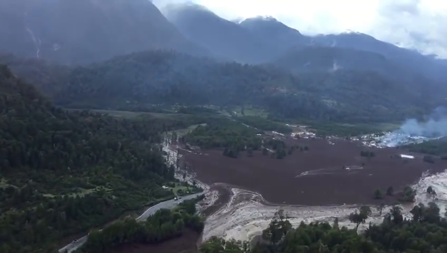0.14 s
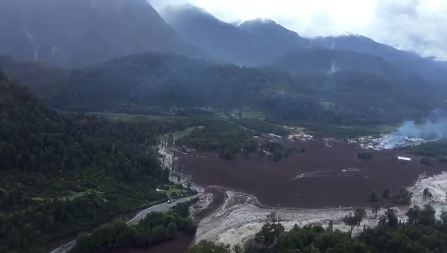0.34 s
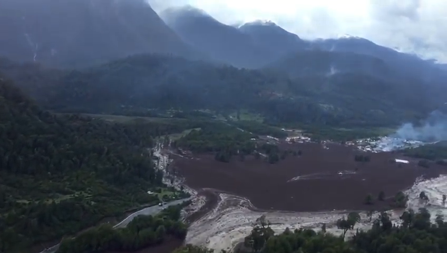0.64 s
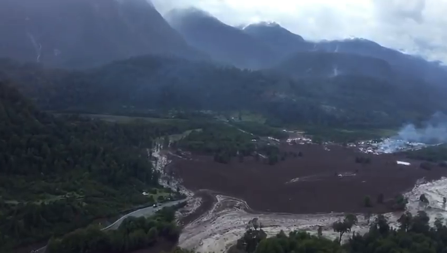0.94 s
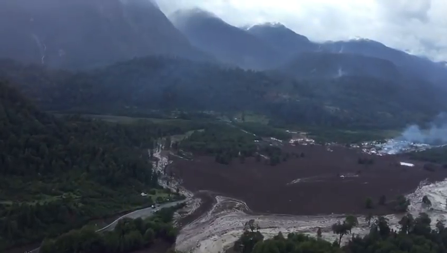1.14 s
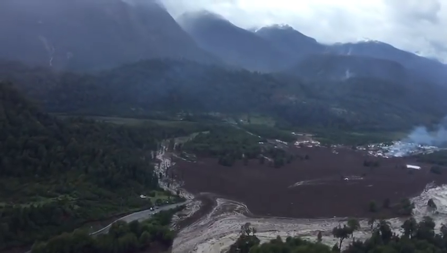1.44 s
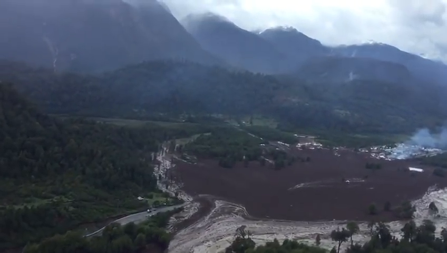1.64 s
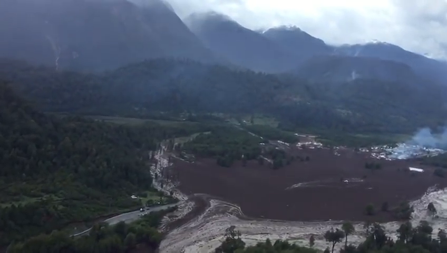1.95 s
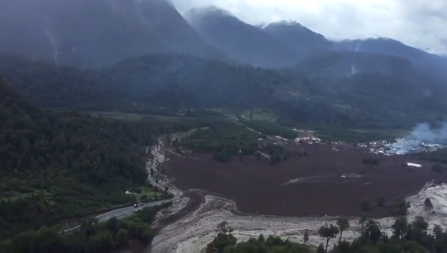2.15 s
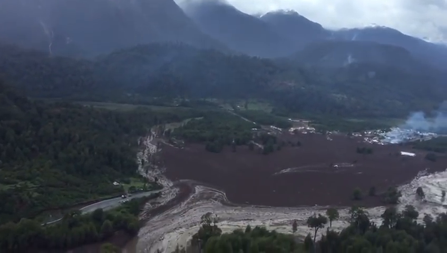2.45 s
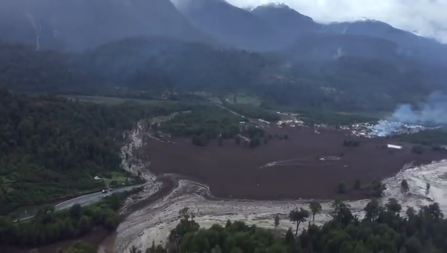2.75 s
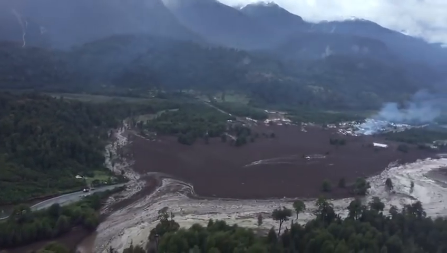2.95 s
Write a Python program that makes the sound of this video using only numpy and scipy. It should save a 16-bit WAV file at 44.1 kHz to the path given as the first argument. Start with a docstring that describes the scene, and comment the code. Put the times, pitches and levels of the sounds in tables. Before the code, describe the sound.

Helicopter in steady flight heard from inside, with a deep rotor drone and high whine.

```python
"""A helicopter's rotors and drive, heard from the cabin in steady cruise.
Main rotor, tail rotor and drive shaft force the cabin periodically, giving three harmonic series
whose neighbouring low tones beat. Gears and turbine whine above them, swelling and fading,
over the broadband rumble, roar, hiss and faint whistle of the air along the hull."""
import sys
import numpy as np
from scipy import signal
from scipy.fft import rfft, irfft, next_fast_len
from scipy.io import wavfile

SR = 44100
rng = np.random.default_rng(int(sys.argv[2]) if len(sys.argv) > 2 else 0)


def master_out(mix):
    """Clip the mix to full scale and print it as 16-bit PCM to the path in sys.argv[1]."""
    frames = np.transpose(np.atleast_2d(mix))
    ceiling = np.clip(frames, -1, 1)
    pcm = np.round(ceiling * 32767).astype(np.int16)
    wavfile.write(sys.argv[1], SR, pcm)


N = 136269
TIME = np.arange(N) / SR
ROTOR_HZ, BLADES = 6.405, 4

# Whine frequencies in Hz: low gear mesh, high gear mesh, thin whine, turbine, turbine octave.
WHINE_HZ = [1821.8, 2432.2, 3425, 4299.8, 8599.6]


def from_db(db):
    """Amplitude grows tenfold with every 20 dB."""
    return 10 ** (np.asarray(db) / 20)


def in_time(rows):
    """Linear interpolation gives a value at every sample. Each row: time in seconds, value."""
    return np.interp(TIME, *np.transpose(rows))


def drift(rate_hz):
    """Low-pass filtering turns white noise into a slow wander of unit standard deviation."""
    hop, settling = 100, 1000
    pole = np.exp(-2 * np.pi * rate_hz * hop / SR)
    white = rng.standard_normal(N // hop + settling + 2)
    slow = signal.lfilter([1], [1, -2 * pole, pole * pole], white)[settling:]
    return np.interp(np.arange(N) / hop, np.arange(len(slow)), slow / slow.std())


def noise(spectrum, repeat=0):
    """Spectral shaping colours white noise; a comb filter feeds back `repeat` of it each rotor turn."""
    hz, db = np.transpose(spectrum)
    size = next_fast_len(N)
    bin_hz = np.maximum(np.arange(size // 2 + 1) * SR / size, 1)
    comb = np.sqrt(1 - repeat ** 2) / (1 - repeat * np.exp(-2j * np.pi * bin_hz / ROTOR_HZ))
    gain = from_db(np.interp(np.log(bin_hz), np.log(hz), db)) * comb
    return irfft(rfft(rng.standard_normal(size)) * gain, size)[:N] * np.sqrt(SR / 2)


def tone(clock, hz, db, jitter_rad=0):
    """A sinusoid of level `db` (rms) follows the drive's clock, so its pitch is proportional to speed."""
    return np.sqrt(2) * from_db(db) * np.sin(2 * np.pi * (hz * clock + rng.random()) + jitter_rad)


def harmonics(clock, hz, orders):
    """A periodic force sounds at whole multiples of its rate; each level wavers a little."""
    return sum(tone(clock, hz * order, db + 0.7 * drift(3)) for order, db in orders.items())


def whine(clock, hz, db):
    """Airframe shaking modulates a tone slightly in amplitude and phase."""
    return tone(clock, hz, db + 0.4 * drift(7), jitter_rad=0.14 * drift(20))


def cabin_rumble():
    """Random air pressure on the hull fills the cabin with low-frequency noise."""
    # Each row: frequency in Hz, density in dB per Hz before the swell.
    spectrum = [(12, -72), (22, -56), (33, -65), (44, -43), (70, -40.5), (105, -48.5), (122, -44),
                (200, -45), (280, -49), (400, -63.5), (900, -105)]
    # Each row: time in seconds, gain in dB.
    swell = [(0, -1), (.9, 0.5), (1.4, 0), (1.6, 3), (1.8, 0.5), (2, -2), (2.15, -1.5), (2.5, -1.5),
             (3.09, .5)]
    return noise(spectrum) * from_db(in_time(swell))


def churning(remainder, depth_db=1.6, rate_hz=11):
    """Turbulence modulates the amplitude of four frequency bands independently."""
    churned = 0
    for edge_hz in (480, 720, 900):
        band = signal.sosfiltfilt(signal.butter(4, edge_hz, fs=SR, output="sos"), remainder)
        churned = churned + band * from_db(depth_db * drift(rate_hz))
        remainder = remainder - band
    return churned + remainder * from_db(depth_db * drift(rate_hz))


def downwash_roar(blade_pulse, chop_db=1.5):
    """Turbulent downwash partly repeats with each rotor turn and rises with each passing blade."""
    # Each row: frequency in Hz, density in dB per Hz before comb filtering and modulation.
    spectrum = [(150, -55.5), (310, -51.5), (415, -50), (455, -54.5), (560, -49), (650, -51), (730, -52),
                (787, -59.5), (830, -50), (870, -60), (1010, -59.5), (1100, -64), (1220, -59), (1350, -71),
                (3000, -105)]
    # Each row: time in seconds, gain in dB.
    swell = [(0, 1.8), (.18, -0.61), (.3, 1.8), (.48, 0), (.8, 0.12), (.95, 2.2), (1.12, 1), (1.4, -0.89),
             (1.7, 0.11), (2.05, -.5), (2.65, -0.48), (3.09, -2.16)]
    roar = churning(noise(spectrum, repeat=0.39))
    return roar * from_db(in_time(swell) + chop_db * blade_pulse)


def slipstream_hiss(blade_pulse, chop_db=1):
    """Blade passage and buffeting modulate the amplitude of high-frequency flow noise."""
    # Each row: frequency in Hz, density in dB per Hz before modulation.
    spectrum = [(700, -83), (1400, -67), (1750, -65.5), (1920, -64.5), (2180, -66), (2360, -62.5),
                (2550, -65.5), (3100, -64), (3750, -66.5), (4300, -63.5), (4850, -72.5), (5350, -70),
                (5800, -71.5), (6500, -73.5), (7500, -80.5), (9000, -80), (10000, -88)]
    # Each row: time in seconds, gain in dB.
    swell = [(0, -0.46), (.7, -1), (1.4, -0.42), (2.3, 0.18), (3.09, 0.19)]
    return noise(spectrum) * from_db(in_time(swell) + chop_db * blade_pulse + 0.5 * drift(13))


def slipstream_whistle():
    """Flow noise confined to a narrow band is heard as a faint, breezy pitch."""
    # Each row: frequency in Hz, density in dB per Hz before the swell.
    spectrum = [(4700, -100), (5150, -76), (5380, -66.5), (5600, -84), (6200, -100)]
    # Each row: time in seconds, gain in dB.
    swell = [(0, -2), (.8, -4), (1.5, -3), (1.75, 3), (2.1, -5), (2.45, 1), (2.75, -7), (3.09, -5)]
    return noise(spectrum) * from_db(in_time(swell))


def rotors(clock, tail_blade_hz=69.32, rise_db_per_s=0.7):
    """Periodic blade forces of the main and tail rotors give two harmonic series, slowly growing."""
    # Each entry: multiple of the main rotor's turning rate, rms level in dB at mid-time.
    main_orders = {8: -29, 10: -37, 12: -29, 14: -40, 16: -31, 20: -33, 21: -33, 22: -32, 23: -33, 24: -30,
                   25: -36.5, 27: -38, 28: -41, 33: -41, 44: -37.5, 48: -38, 59: -43, 63: -39, 64: -39, 67:
                   -42, 83: -39, 87: -43, 90: -42, 91: -42}
    # Each entry: multiple of the tail rotor's blade rate, rms level in dB at mid-time.
    tail_orders = {1: -19.2, 2: -34, 3: -30}
    drone = harmonics(clock, ROTOR_HZ, main_orders) + harmonics(clock, tail_blade_hz, tail_orders)
    return drone * from_db(rise_db_per_s * (TIME - TIME.mean()))


def drive_shaft(clock, shaft_hz=99.98):
    """The turning shaft drives the cabin into forced vibration at harmonics of its rate."""
    # Each entry: multiple of the turning rate, rms level in dB.
    orders = {1: -29.5, 2: -21.7, 4: -41, 6: -38, 8: -43, 12: -51, 16: -55, 24: -45}
    return harmonics(clock, shaft_hz, orders)


def gearbox(clock):
    """Periodic tooth contact gives steady tones and whines that swell and fade."""
    # Gear and accessory tones. Each row: frequency in Hz, rms level in dB.
    steady_tones = [(95, -30), (97.9, -28.5), (754.2, -40), (813, -49.5), (832.5, -48), (1261, -39.5),
                    (1631.3, -44.5), (1846.5, -44.5), (1892, -50), (2477, -52.5), (2792, -49.5),
                    (4100, -56), (4249, -58), (4751, -50), (6850, -58), (9050, -60.5)]
    # Envelopes of three whines. Each row: time in seconds, rms level in dB.
    low_mesh = [(0, -30), (.5, -31.5), (1.1, -32.5), (1.65, -32), (2.1, -36), (2.35, -34), (2.5, -39),
                (2.8, -37), (3.09, -33)]
    high_mesh = [(0, -37), (.35, -38), (.55, -34.5), (1.3, -34.5), (2.1, -33.5), (2.7, -35), (2.9, -39.5),
                 (3.09, -45)]
    thin_whine = [(0, -42), (.3, -50), (.55, -60), (.9, -46), (1.2, -55), (1.6, -47), (2.05, -42),
                  (2.3, -40), (3.09, -36)]
    steady = sum(whine(clock, hz, db) for hz, db in steady_tones)
    swelling = zip(WHINE_HZ[:3], (low_mesh, high_mesh, thin_whine))
    return steady + sum(whine(clock, hz, in_time(levels)) for hz, levels in swelling)


def turbine(clock):
    """Fast rotation gives a high fundamental and its octave, each swelling and fading separately."""
    # Envelopes of the two partials. Each row: time in seconds, rms level in dB.
    fundamental = [(0, -33.5), (.2, -32.5), (.36, -44), (.62, -47), (.88, -36), (1.1, -36), (1.22, -31.5),
                   (1.38, -30.5), (1.6, -33.5), (1.92, -43), (2.4, -43), (2.6, -36.5), (2.72, -38.5),
                   (2.9, -26.2), (3.01, -30.5), (3.09, -27.5)]
    octave = [(0, -64), (.5, -60), (.85, -51), (1.25, -55), (1.6, -62), (2, -58), (2.7, -62), (2.9, -49.5),
              (3.09, -52)]
    partials = zip(WHINE_HZ[3:], (fundamental, octave))
    return sum(whine(clock, hz, in_time(levels)) for hz, levels in partials)


def scene():
    """Air noise and machine tones superpose; one geared drive holds the tones in fixed ratios."""
    # The governor lets the drive wander. Each row: time in seconds, speed change in percent.
    speed_change = [(0, 0.041), (.4, .04), (.8, -0.013), (1.1, -0.034), (1.7, -.02), (2.1, -0.043),
                    (2.4, 0.014), (2.7, 0.062), (3.1, 0.05)]
    clock = np.cumsum(1 + in_time(speed_change) / 100) / SR
    blade_pulse = np.cos(2 * np.pi * BLADES * ROTOR_HZ * clock)
    air = cabin_rumble() + downwash_roar(blade_pulse) + slipstream_hiss(blade_pulse)
    air += slipstream_whistle()
    return (air + rotors(clock) + drive_shaft(clock) + gearbox(clock) + turbine(clock))[None]


def record(dry, cutoff_hz=10300):
    """An elliptic low-pass filter cuts the highest treble steeply."""
    return signal.sosfilt(signal.ellip(12, .2, 80, cutoff_hz, fs=SR, output="sos"), dry)


dry = scene()
out = record(dry)
master_out(out)
```